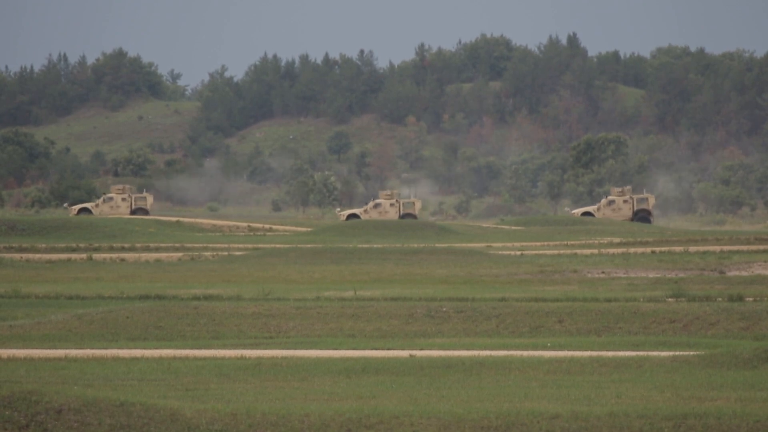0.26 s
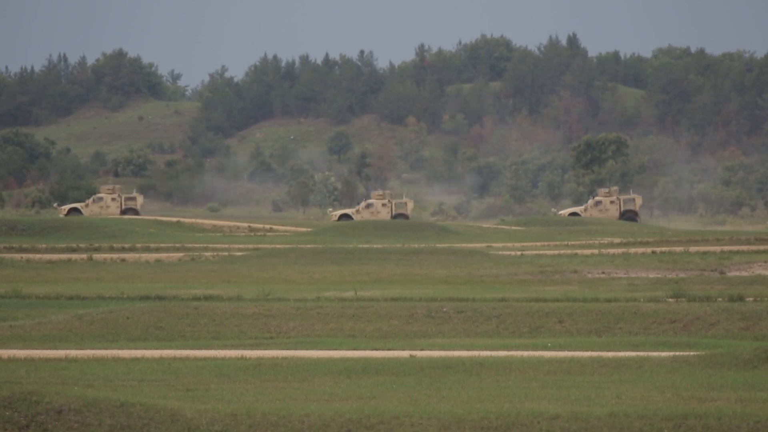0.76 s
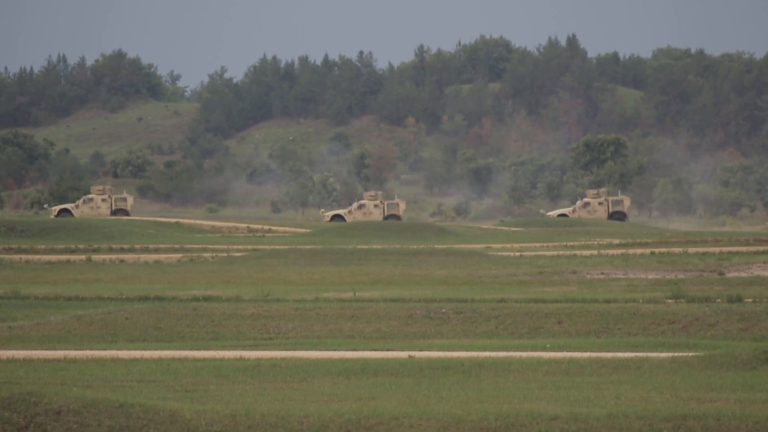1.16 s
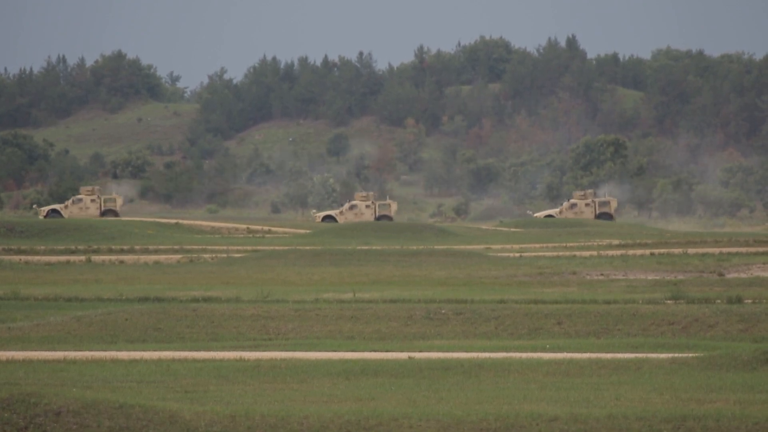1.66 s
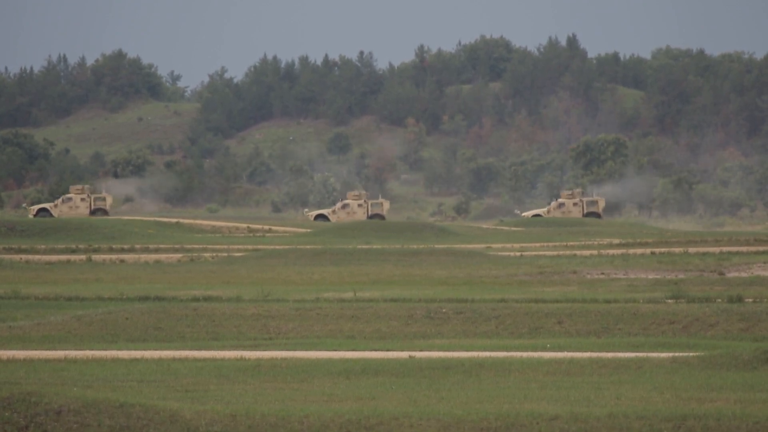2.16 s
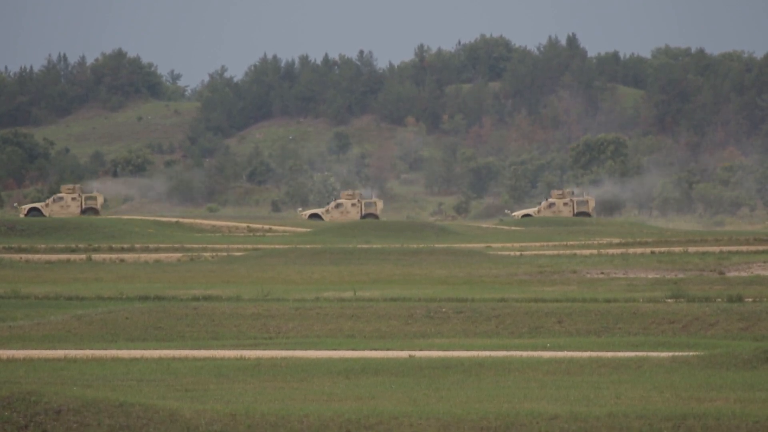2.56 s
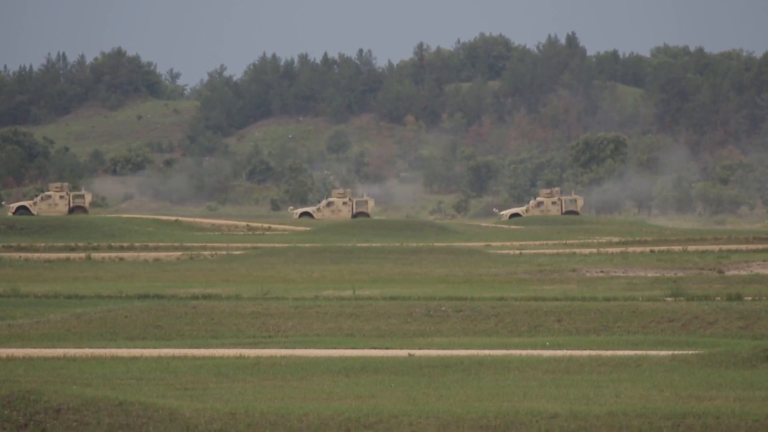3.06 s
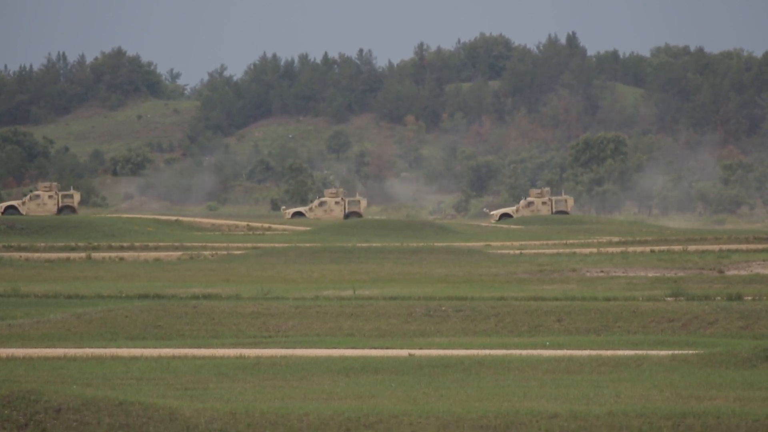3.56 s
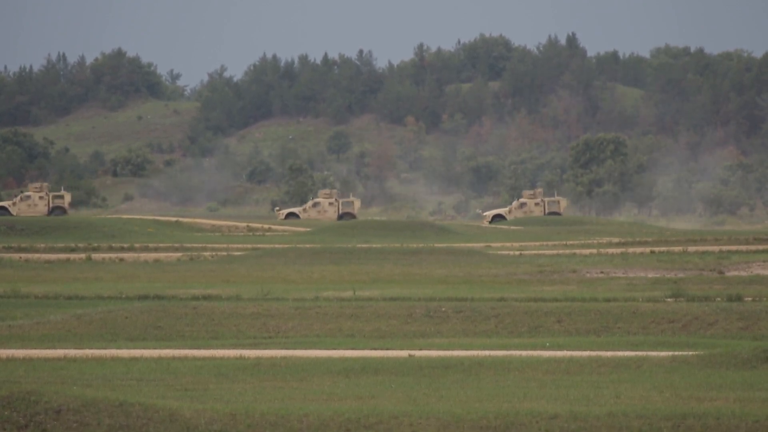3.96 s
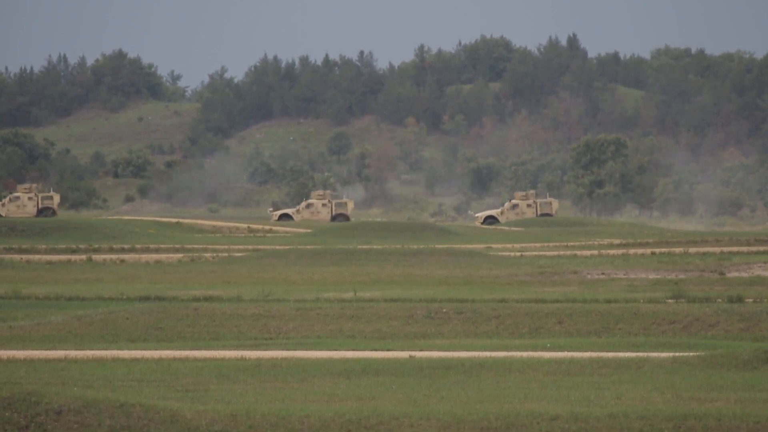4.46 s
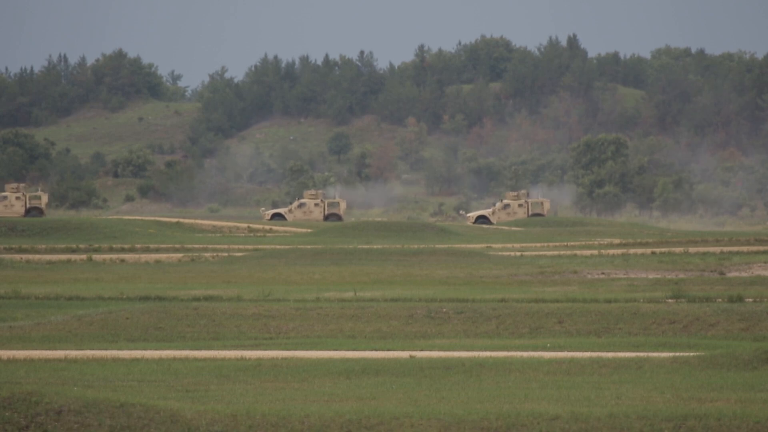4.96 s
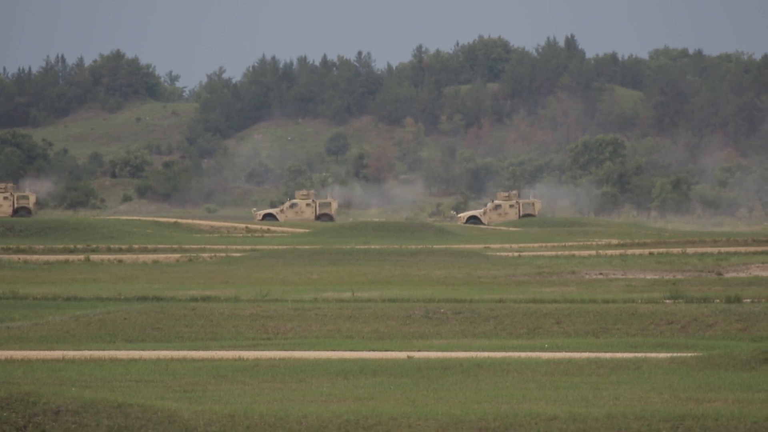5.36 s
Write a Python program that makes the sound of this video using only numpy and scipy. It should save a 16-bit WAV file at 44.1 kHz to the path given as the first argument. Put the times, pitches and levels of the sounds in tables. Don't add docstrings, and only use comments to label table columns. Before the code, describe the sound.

Outdoors on a wide grass range, military vehicles' heavy machine guns fire from several positions. First only engine rumble and tiny metallic clicks, then rapid thumping shots, about eight a second per gun, peaking in a short hard burst. A lull leaves engines and faint echo before a longer, irregularly overlapping volley. One gun fires last and stops. The dull, distant microphone softens the treble and adds faint hiss.

```python
import sys
import numpy as np
from scipy import signal
from scipy.fft import rfft, irfft, next_fast_len
from scipy.io import wavfile
from scipy.ndimage import uniform_filter1d, map_coordinates

SR = 44100
rng = np.random.default_rng(int(sys.argv[2]) if len(sys.argv) > 2 else 0)


def digitize_waveform(pressure):
    field = np.atleast_2d(pressure).T
    bounded = np.clip(field, -1, 1)
    quanta = np.round(bounded * 32767).astype(np.int16)
    wavfile.write(sys.argv[1], SR, quanta)


def field_ratio(decibels):
    return 10 ** (np.asarray(decibels, dtype=float) / 20)


N = 247401


def unit(x):
    return x / np.sqrt(np.mean(x ** 2, axis=-1, keepdims=True) + 1e-20)


def along(points, hz):
    f, value = np.transpose(points)
    return np.interp(np.log(hz + 1), np.log(f + 1), value)


def wobble(rate):
    knots = rng.standard_normal(int(N * rate / SR) + 4)
    return map_coordinates(knots, [np.arange(N) * rate / SR])


def coloured(x, spectrum):
    m = next_fast_len(N + 8192)
    gain = field_ratio(along(spectrum, np.fft.rfftfreq(m, 1 / SR)))
    return irfft(rfft(x, m) * gain, m)[:N]


def push(t, hz, t60):
    after = np.maximum(t, 0)
    swell = np.exp(np.minimum(t, 0) * hz * 7)
    swing = np.cos(2 * np.pi * hz * after + np.pi / 3.5)
    return swell * field_ratio(-60 * after / t60) * swing


def scattered(t, scatter_db, scatter_t60, trees_s, trees_db, chance):
    noise = rng.standard_normal(len(t))
    after = np.maximum(t, 0)
    behind_front = t > 0.0004
    hull = field_ratio(scatter_db + 0.5 - 60 * (after / scatter_t60) ** 1.3)
    field = field_ratio(scatter_db - 14.5 - 60 * after / 0.12)
    trees = field_ratio(trees_db + 2 * chance - 34 * np.abs((t - trees_s) / 0.037) ** 0.82)
    knots = t[::90]
    clumps = field_ratio(1.1 * np.interp(t, knots, rng.standard_normal(len(knots))))
    early = noise * hull * behind_front
    late = noise * clumps * (field * behind_front + trees)
    return early, late


def gun(shots, crack, bank, ground_s, ground_db, scatter_db, scatter_t60, trees_s, trees_db,
        thump_hz, boom_db, edge_db):
    lead = 256
    out = np.zeros(N + SR)
    t = (np.arange(SR // 5) - lead) / SR
    ring_t = t[lead:lead + 768]
    usual_db = np.mean([shot[1] for shot in shots])
    for s, low_db, bright_db, lean_db in shots:
        upper_db = low_db + bright_db
        levels = (low_db, low_db - 6, upper_db + lean_db, upper_db - lean_db, upper_db + edge_db - 3.5)
        chance = rng.standard_normal(5)
        early, late = scattered(t, scatter_db, scatter_t60, trees_s, trees_db, chance[0])
        bounce = round(ground_s * (1 + 0.033 * chance[1]) * SR)

        blast = field_ratio(low_db - 1) * np.exp(-np.abs(t) / 0.0003) * (t < 0)
        for (hz, t60), db, k in zip(crack, levels, chance):
            paths = early * (hz / 2000) ** 1.35 + late * (hz / 2000) ** -0.2
            paths[lead] = 1
            paths = paths + field_ratio(ground_db) * np.roll(paths, bounce)
            turn = 2 * np.pi * hz * (1 + 0.02 * k) * ring_t + np.pi / 3.8
            ring = field_ratio(-60 * ring_t / t60) * np.cos(turn)
            band = signal.fftconvolve(paths, ring)[:len(t)]
            onset_rms = np.sqrt(np.mean(band[lead:lead + 200] ** 2))
            blast = blast + field_ratio(db - 5.5) * band / onset_rms

        thump = push(t, thump_hz, t60=0.028)
        for delay, db, hz in bank:
            thump = thump + field_ratio(db) * push(t - delay, hz, t60=0.048)
        thump_db = boom_db + 0.13 * (low_db - usual_db)
        out[round(s * SR) + 55:][:len(t)] += blast + field_ratio(thump_db + 5) * thump
    return out[lead:N + lead]


def mid_gun():
    # t/s, strength/dB, brightness of upper resonances/dB, lean from high to middle resonance/dB
    shots = [
        (2.1668, -11.5, -14, 5),
        (2.2779, -11.5, -14.5, 6.5),
        (2.3913, -11, -23, 5.5),
        (2.5204, -11, -21, -2),
    ]
    # f/Hz, t60/s
    crack = [(580, 0.0052), (930, 0.0056), (1400, 0.0082), (2300, 0.0088), (3100, 0.0018)]
    # delay/s, level/dB, f/Hz
    bank = [
        (0.0115, -1.5, 114),
        (.030, -11.5, 115),
    ]
    return gun(shots, crack, bank, ground_s=0.001346, ground_db=-11.5, scatter_db=-20.5,
               scatter_t60=0.039, trees_s=0.0413, trees_db=-41.5, thump_hz=157, boom_db=-25.5, edge_db=7.5)


def near_gun():
    # t/s, strength/dB, brightness of upper resonances/dB, lean from high to middle resonance/dB
    shots = [(1.8154, -21.5, 0.5, 4), (1.9324, -18.5, -0.5, 4), (2.0725, -16.5, 1.5, 3.5),
             (3.488, -14.5, -5, -8.5), (3.6265, -16, -3, -4.5), (3.7455, -14.5, -6, 4),
             (3.8652, -17, 0.2, 2.5), (3.9817, -16, -0.5, -0.5), (4.1011, -14.5, -1.5, -4.5),
             (4.2281, -13, -4, -4.5), (4.3513, -13, -7, -4.5), (4.4724, -13, -5.5, 1),
             (4.5941, -13.5, -7.5, 4), (4.7136, -14, -6.5, .8), (4.8426, -13, -6, 2.5)]
    # f/Hz, t60/s
    crack = [(570, 0.0092), (760, 0.0085), (1420, 0.012), (2050, 0.0038), (2900, 0.0018)]
    # delay/s, level/dB, f/Hz
    bank = [
        (0.0127, -8, 116.5),
        (0.033, -12.5, 124),
    ]
    return gun(shots, crack, bank, ground_s=0.00135, ground_db=-20, scatter_db=-20.5,
               scatter_t60=0.019, trees_s=0.033, trees_db=-56, thump_hz=174, boom_db=-20, edge_db=-0.5)


def far_gun():
    # t/s, strength/dB, brightness of upper resonances/dB, lean from high to middle resonance/dB
    shots = [(0.759, -22.5, 6, 0), (0.8962, -20, 1.3, 0.6), (1.0129, -21, -1.8, 1.8),
             (1.1213, -20.5, -1, 0.2), (1.2313, -20, -4, -2.5), (1.3411, -19, -4, 0),
             (1.4664, -20, -5.5, 3), (1.5832, -20, -5.5, 4.5), (1.6913, -20, -6.5, 6),
             (1.809, -16.5, -7.5, -5.5), (1.9227, -19, -10.5, 3), (2.0416, -19, -9, 5.5),
             (3.6058, -20.5, -8.5, -7), (3.7341, -23.5, -.3, 6), (3.8509, -21.5, -6.5, 1),
             (3.9641, -19.5, -6.5, 2), (4.0875, -21, -6.5, 2.5), (4.2039, -22.5, -2.5, 1.5),
             (4.3197, -23, -5.5, -1.5), (4.4335, -23, -5, -2), (4.5515, -20.5, -9.5, -2)]
    # f/Hz, t60/s
    crack = [(560, 0.0051), (930, 0.011), (1360, 0.0058), (2650, 0.002), (3100, 0.00061)]
    # delay/s, level/dB, f/Hz
    bank = [
        (.012, -2.5, 88),
        (.030, -5.5, 96),
    ]
    return gun(shots, crack, bank, ground_s=0.002208, ground_db=-9.5, scatter_db=-13.5,
               scatter_t60=0.022, trees_s=0.0475, trees_db=-34.5, thump_hz=138.5, boom_db=-27.5, edge_db=-1)


def turned_gun():
    # t/s, strength/dB, brightness of upper resonances/dB, lean from high to middle resonance/dB
    shots = [
        (4.6679, -17, -1.9, 4.5),
        (4.779, -16, -2, 5),
        (4.8934, -17.5, -4, 4),
        (5.012, -17, -3.2, 4.5),
        (5.1288, -19.5, -4.5, 5.5),
        (5.242, -20.5, -2.2, 5.8),
    ]
    # f/Hz, t60/s
    crack = [(600, 0.0056), (870, 0.0024), (1430, 0.0024), (2300, 0.0054), (3100, 0.0025)]
    # delay/s, level/dB, f/Hz
    bank = [
        (0.012, 0, 100),
        (0.033, -6, 109),
    ]
    return gun(shots, crack, bank, ground_s=0.001376, ground_db=-9.5, scatter_db=-11.5,
               scatter_t60=0.023, trees_s=0.047, trees_db=-37, thump_hz=140, boom_db=-28, edge_db=1.5)


def hill(x):
    # f/Hz, t60/s
    decay = [(80, 1.2), (600, 0.8), (2000, 1.2), (5000, 0.15)]
    hz, t, z = signal.stft(rng.standard_normal(SR), SR, nperseg=256)
    fade = field_ratio(-60 * t / along(decay, hz)[:, None])
    tail = signal.istft(z * fade, SR, nperseg=256)[1]
    delayed = np.pad(x, (2600, 0))
    return signal.fftconvolve(delayed, tail / np.linalg.norm(tail))[:N]


def through_air(x):
    # f/Hz, level/dB
    response = [(25, -13), (60, 5.5), (220, 0), (330, -4), (410, -6), (500, 0), (3400, 0.5), (4000, -8),
                (5000, -21), (6300, -32), (8000, -47.5), (12000, -69)]
    return coloured(x, response)


def rush(spectrum, patchy_db):
    z = signal.stft(rng.standard_normal(N), nperseg=512)[2]
    field = uniform_filter1d(rng.standard_normal(z.shape), size=6, axis=0)
    field = uniform_filter1d(field, size=12, axis=1)
    patches = field_ratio(patchy_db * field / field.std())
    patched = signal.istft(z * patches, nperseg=512)[1][:N]
    return unit(coloured(patched, spectrum))


def engines():
    # t/s, level over idle/dB
    load = [
        (0.0, 0.3),
        (0.6, 0.1),
        (1.7, 3.5),
        (2.4, 2),
        (3.2, -0.3),
        (3.48, 0),
        (3.81, 3),
        (4.86, 4.5),
        (5.61, 1.9),
    ]
    # f/Hz, level per Hz/dB
    rumble_colour = [(20, -28), (45, -12.5), (70, -3.5), (100, -1.5), (135, 0), (170, -5), (200, 2),
                     (230, -10), (300, -6.5), (350, -10.5), (450, -17.5), (700, -63)]
    # f/Hz, level per Hz/dB
    wash_colour = [(250, -16.5), (450, 2), (900, -1), (1400, -2.5), (1700, -4.5), (2500, -4), (3550, -6.5),
                   (3800, -12.5), (4600, -19.5), (4900, -46), (6500, -45)]
    # f/Hz, peak level/dB
    shafts = [(38.5, -47.5), (199, -54.5), (623.5, -57.5), (1066, -66), (2492, -86), (3113, -66)]
    s, roll_db = np.transpose(load)
    t = np.arange(N) / SR
    rumble_db = np.interp(t, s, -40.5 + 0.92 * roll_db) + wobble(6.1)
    wash_db = np.interp(t, s, -51 + 1.18 * roll_db) + 1 + 0.2 * wobble(6.7)
    out = field_ratio(rumble_db) * rush(rumble_colour, patchy_db=0.3)
    out = out + field_ratio(wash_db) * rush(wash_colour, patchy_db=0.17)
    for hz, db in shafts:
        level = field_ratio(db - 0.5 + 0.67 * wobble(3.6))
        turns = np.cumsum(hz * (1 + 0.004 * wobble(3))) / SR
        out = out + level * np.sin(2 * np.pi * turns)
    return out


def ticks():
    # t/s, peak level/dB, f/Hz
    taps = [
        (0.1471, -37, 3300),
        (0.1588, -31.5, 2500),
        (0.634, -34, 2090),
    ]
    out = np.zeros(N)
    t = np.arange(SR // 20) / SR
    for s, db, hz in taps:
        shake = uniform_filter1d(np.cumsum(rng.standard_normal(len(t))), size=30) * 0.14
        envelope = field_ratio(db - 2.5 - 60 * t / 0.044) * (1 - np.exp(-t / 0.0018))
        out[round(s * SR):][:len(t)] += envelope * np.sin(2 * np.pi * hz * t + shake)
    return out


def preamp_hiss():
    # f/Hz, level per Hz/dB
    hiss_colour = [(500, -26.5), (4000, 4.5), (8000, -2.5), (14900, -4), (15100, -58)]
    return field_ratio(-70) * unit(coloured(rng.standard_normal(N), hiss_colour))


def scene():
    fire = mid_gun() + near_gun() + far_gun() + turned_gun()
    gunfire = through_air(fire + field_ratio(-28.5) * hill(fire))
    return (gunfire + engines() + ticks())[None]


def top_cut(x):
    return signal.sosfilt(signal.butter(12, 15000, fs=SR, output="sos"), x)


def record(dry):
    mix = dry + preamp_hiss()
    return top_cut(mix)


dry = scene()
out = record(dry)
digitize_waveform(out)
```